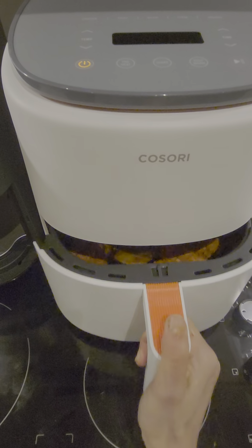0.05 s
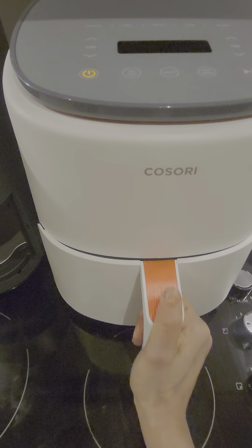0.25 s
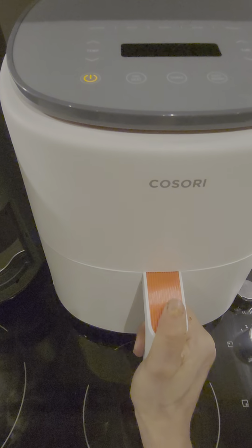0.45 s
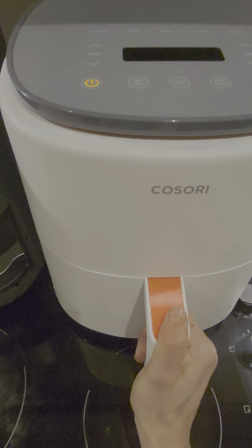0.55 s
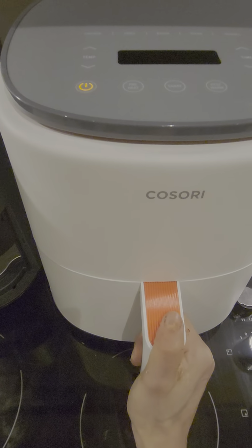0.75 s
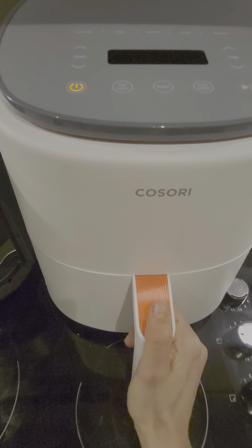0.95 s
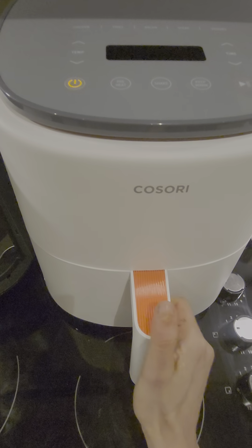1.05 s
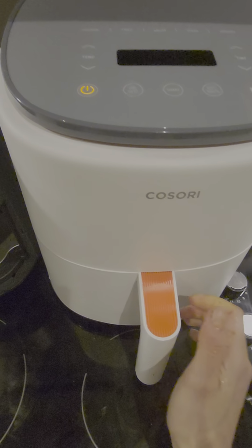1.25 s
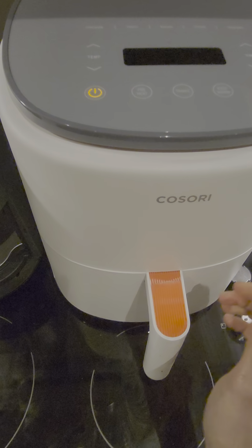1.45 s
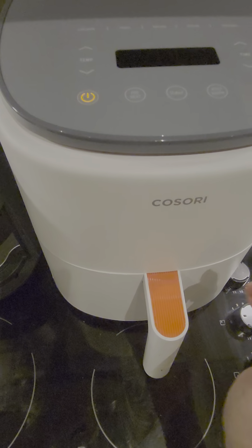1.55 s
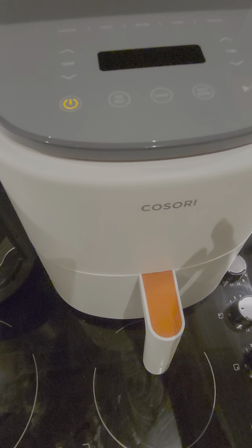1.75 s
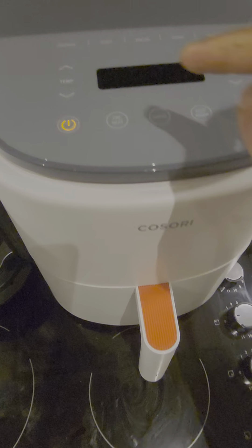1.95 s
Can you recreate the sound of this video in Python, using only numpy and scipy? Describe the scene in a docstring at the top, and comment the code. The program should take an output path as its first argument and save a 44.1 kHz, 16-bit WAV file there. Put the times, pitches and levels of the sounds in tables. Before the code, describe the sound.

Close by in a quiet kitchen, an air fryer drawer slides in with a scrape and two plastic knocks, then clunks shut. A soft ring fades as fingers barely brush the handle over a faint hum.

```python
"""An air fryer basket knocks against its housing and shuts with a clunk, close by in a quiet kitchen.
Pushed along its rails, it scrapes by stick-slip friction, knocks twice, then snaps past the catch.
Each impact excites free vibration: the plastic shell clacks and booms, its walls and the metal pan ring,
and heavy blows rock the fryer on its feet. One low note lingers as the hand brushes off the handle.
The room adds diffuse reverberation, a faint rumble and a hum."""
import sys
import numpy as np
from scipy import signal
from scipy.fft import rfft, irfft
from scipy.io import wavfile

SR = 44100
rng = np.random.default_rng(int(sys.argv[2]) if len(sys.argv) > 2 else 0)


def dump_mix(stems):
    """Bounce the given channels to the path in sys.argv[1] as a 16-bit WAV at rate SR."""
    frames = np.atleast_2d(stems).T  # one column per channel
    limited = np.clip(frames, -1, 1)  # hard clip at full scale
    pcm = np.round(limited * 32767).astype(np.int16)
    wavfile.write(sys.argv[1], SR, pcm)


N = 88200

# impacts of basket on housing (time [s], boom level [dB], clack level [dB], tick level [dB])
IMPACTS = [(0.0341, -39.5, -29.5, -75.5), (0.0379, -31, -30.5, -70), (0.195, -37.5, -39.5, -69),
           (.221, -34, -15, -42), (.2275, -22, -18, -44), (.241, -24.5, -19.5, -59.5),
           (0.2534, -15, -39.5, -82.5), (.319, -39.5, -13.5, -35.5), (0.3274, -19, -15.5, -37),
           (0.3369, -10.5, -20, -45.5), (.339, -13.5, -32.5, -62), (.560, -39.5, -23, -32.5),
           (0.566, -44, -26.5, -38), (0.5721, -33.5, -16.5, -22.5), (0.575, -31.5, -20, -32.5),
           (0.5817, -25.5, -18, -38.5), (0.584, -20.5, -8, -29.5), (.589, -22.5, -18, -39.5),
           (0.5964, -28, -37, -53), (0.884, -52.5, -86, -102)]
# modes of the hollow housing (frequency [Hz], gain [dB], T60 [s], left minus right [dB])
HOLLOW_MODES = [(197, -11, .14, 1), (226, -22, .3, 1), (297, -1, .085, -2), (320, -6, .08, -3),
                (402, 0, .065, -8), (436, -9, .05, -7)]
# ringing modes of the housing walls and metal pan, sounded by hard contacts
# (frequency [Hz], gain [dB], T60 [s], left minus right [dB])
WALL_AND_PAN_MODES = [(576, 2, .07, -2), (622, -1, .08, -1), (690, -3, .05, 0), (825, -2, .05, 1),
                      (1130, -4, .07, 1), (1292, -6, .1, 2), (1480, -4, .12, 1), (1800, 3, .07, -2),
                      (2020, -2, .08, -3), (2152, -9, .22, -2), (2305, 1, .09, -3), (2525, 0, .09, -2),
                      (2978, -6, .13, -2)]
# spectra of the plastic's clack and sharp tick (frequency [Hz], relative density [dB])
CLACK_SPECTRUM = [(60, -19.5), (250, 1.5), (470, 3), (600, 12.5), (820, -0.5), (1000, -2), (1300, -0.5),
                  (1800, -2), (2600, -7), (3600, -15.5), (4200, -17), (9000, -43), (16000, -52)]
TICK_SPECTRUM = [(500, -31), (2000, 5), (3400, 6.5), (4300, -9), (6000, -1.5), (8000, -3), (10000, -10.5),
                 (15500, -16.5)]
# damping of the clack and tick (frequency [Hz], T60 [s])
CLACK_DECAY = [(200, .06), (1000, .042), (2500, .04), (8000, .035), (16000, .03)]
TICK_DECAY = [(2000, 0.089), (6000, 0.081), (16000, 0.085)]
# blows that rock the fryer (time [s], bounce level [dB], sway level [dB])
HEAVY_BLOWS = [(0.23, -33, -53.5), (0.331, -26.5, -31.5), (0.364, -31, -37.5), (.601, -18.5, -38.5),
               (0.63, -35, -25.5), (0.727, -37.5, -38.5)]
# course of the rail friction (time [s], body level [dB], hiss level [dB])
FRICTION_LEVELS = [(0, -43, -60), (.05, -39.5, -59.5), (0.119, -39, -54.5), (.17, -43, -59.5),
                   (0.211, -38, -60), (0.302, -37, -62.5), (0.339, -44, -75), (0.421, -69.5, -97),
                   (.52, -63, -94.5), (.548, -40.5, -67.5), (0.574, -38, -54.5), (0.601, -81.5, -97.5)]
# spectra of the scrape's hollow body and fine hiss (frequency [Hz], relative density [dB])
BODY_SPECTRUM = [(40, -15), (100, 0.5), (200, -10.5), (330, 6), (520, -2.5), (1100, -3), (1500, -7.5),
                 (2400, -7.5), (3400, -15), (4400, -27.5), (8000, -50.5), (15500, -60)]
HISS_SPECTRUM = [(1500, -28), (4000, -5.5), (6400, -0.5), (8200, -3), (10500, -9), (15500, -10.5)]
# fingers on the handle (time [s], rise [s], fade [s], level [dB], centre [Hz], width [octaves])
FINGER_RUBS = [(1.047, 0.009, 0.094, -75.5, 2894, 0.37), (1.072, 0.027, .06, -82.5, 7940, 0.42),
               (1.16, 0.025, 0.087, -74.5, 1940, 1.3), (1.43, .012, 0.075, -77, 2250, 0.39),
               (1.445, 0.018, .05, -82, 7500, 0.67), (1.632, 0.031, 0.083, -70.5, 8900, 0.66),
               (1.66, 0.012, 0.15, -74, 1572, 0.95), (1.783, 0.012, 0.086, -68.5, 1163, 0.52),
               (1.784, 0.0099, .04, -74, 5914, 1.4)]
# reverberation time of the kitchen (frequency [Hz], T60 [s])
ROOM_DECAY = [(60, .42), (160, .7), (280, .5), (500, .52), (1200, .47), (2400, .53), (3500, .48),
              (5000, .48), (9000, .41), (15000, .26)]
# strength of the reverberation (frequency [Hz], gain [dB])
ROOM_RESPONSE = [(50, -14), (100, -9.5), (170, -8.5), (400, -15.5), (1100, -12), (2300, -17.5),
                 (4000, -15.5), (8000, -15.5), (15000, -13.5)]
# spectrum of the room tone (frequency [Hz], relative density [dB])
RUMBLE_SPECTRUM = [(15, -45), (25, -1.5), (102, 2.5), (149, -15.5), (185, -6), (212, -12.5), (344, -12.5),
                   (607, -25.5), (1400, -35.5), (5000, -50), (8140, -43.5), (16000, -51.5)]
# likeness of the two channels (frequency [Hz], correlation [0 to 1])
STEREO_COHERENCE = [(60, .98), (180, 0.92), (350, 0.61), (700, 0.06), (16000, .05)]
# balance of the two channels (frequency [Hz], left minus right [dB])
STEREO_BALANCE = [(100, -1), (270, 1), (450, -0.5), (750, -2.5), (1200, 4.5), (2000, -3.5), (3300, 0),
                  (5500, 0.5), (15000, -0.5)]

# rocking on the feet (frequency [Hz], gain [dB], T60 [s], left minus right [dB])
BOUNCE_MODE, SWAY_MODE = (91, 0, .24, .5), (53, 0, .36, 0)
BOOM_RISE_S, CONTACT_RISE_S, ROCK_RISE_S, RIGHT_DELAY_S = .0016, .00082, .0026, .00046
RING_RE_CLACK_DB, SHELL_SHARE = -19, .3  # share of the noise power common to all impacts
SLIPS_PER_S, SLIP_SPREAD_DB = 4200, -5.5
LINGER_AT_S, LINGER_HZ, LINGER_DB, LINGER_T60_S = .586, 355, -49.5, 1.3
RUMBLE_DB, HUM_HZ, HUM_DB = -65, 98, -75
CUTOFF_HZ = 15900


def basket_impacts():
    """Impact excitation: the housing booms, its walls and the pan ring, the plastic clacks and ticks."""
    out = np.zeros((2, N))
    boom = damped_modes(HOLLOW_MODES, BOOM_RISE_S, RIGHT_DELAY_S)
    ring = amp(RING_RE_CLACK_DB) * damped_modes(WALL_AND_PAN_MODES, CONTACT_RISE_S, RIGHT_DELAY_S)
    shell = noise(.1)
    rise = 1 - np.exp(-np.arange(shell.shape[1]) / SR / CONTACT_RISE_S)
    for start, boom_db, clack_db, tick_db in IMPACTS:
        excitation = np.sqrt(SHELL_SHARE) * shell + np.sqrt(1 - SHELL_SHARE) * noise(.1)
        clack = damp_bands(unit_rms(stereo_filter(excitation, CLACK_SPECTRUM)), CLACK_DECAY)
        tick = damp_bands(unit_rms(stereo_filter(excitation, TICK_SPECTRUM)), TICK_DECAY)
        add(out, start, rise * (amp(clack_db) * clack + amp(tick_db) * tick))
        add(out, start, amp(boom_db) * boom + amp(clack_db) * ring)
    return out


def fryer_rocking():
    """Mass on a spring: heavy blows make the fryer bounce and sway on its rubber feet."""
    out = np.zeros((2, N))
    bounce = damped_modes([BOUNCE_MODE], ROCK_RISE_S)
    sway = damped_modes([SWAY_MODE], ROCK_RISE_S)
    for start, bounce_db, sway_db in HEAVY_BLOWS:
        add(out, start, amp(bounce_db) * bounce + amp(sway_db) * sway)
    return out


def rail_scrape():
    """Stick-slip friction: tiny random slips over a smooth rub drive a hollow body and a fine hiss."""
    t = np.arange(N) / SR
    slips = rng.random(N) < SLIPS_PER_S / SR
    strengths = amp(SLIP_SPREAD_DB * np.minimum(rng.exponential(1, N), 4))
    friction = unit_rms(slips * strengths * noise(N / SR)) + noise(N / SR)
    times, body_db, hiss_db = np.transpose(FRICTION_LEVELS)
    body = unit_rms(stereo_filter(friction, BODY_SPECTRUM)) * amp(np.interp(t, times, body_db))
    hiss = unit_rms(stereo_filter(friction, HISS_SPECTRUM)) * amp(np.interp(t, times, hiss_db))
    return body + hiss


def lingering_mode():
    """Free decay: one lightly damped mode of the metal rings on after the closing clunk."""
    t = np.maximum(np.arange(N) / SR - LINGER_AT_S, 0)
    return amp(LINGER_DB - 60 * t / LINGER_T60_S) * np.sin(2 * np.pi * LINGER_HZ * t)


def finger_rubs():
    """Sliding friction: skin leaving the handle gives soft bursts of band-limited noise."""
    out, t = np.zeros((2, N)), np.arange(SR // 2) / SR
    hz = np.fft.rfftfreq(len(t), 1 / SR) + 1
    for start, rise_s, fade_s, db, centre, octaves in FINGER_RUBS:
        band = np.exp(-.5 * (np.log2(hz / centre) / octaves) ** 2)
        rub = unit_rms(irfft(rfft(noise(.5)) * band))
        envelope = np.minimum(t / rise_s, 1) * np.exp(-(t / fade_s) ** 2)
        add(out, start, amp(db) * rub * envelope)
    return out


def kitchen_reverberation(direct, build_s=.01, length_s=.9):
    """Diffuse field: the dense reflections of a small hard room act as a decaying noise response."""
    t = np.arange(SR) / SR
    tail = damp_bands(noise(1), ROOM_DECAY) * (1 - np.exp(-t / build_s))
    response = stereo_filter(tail / np.linalg.norm(tail[0]), ROOM_RESPONSE) * (t < length_s)
    return signal.fftconvolve(direct, response, axes=1)[:, :N]


def room_tone():
    """Noise floor: a faint rumble and the pure tone of a humming appliance."""
    rumble = unit_rms(stereo_filter(noise(N / SR), RUMBLE_SPECTRUM))
    hum = np.sqrt(2) * np.sin(2 * np.pi * HUM_HZ * np.arange(N) / SR)
    return amp(RUMBLE_DB) * rumble + amp(HUM_DB) * hum


def damped_modes(modes, rise_s, right_delay_s=0):
    """Modal superposition: decaying sinusoids, with a level and time offset between the channels."""
    t = np.maximum(np.arange(SR) / SR - np.array([[0], [right_delay_s]]), 0)
    side = np.array([[.5], [-.5]])
    ringing = sum(amp(db - 60 * t / t60 + side * balance_db) * np.sin(2 * np.pi * hz * t)
                  for hz, db, t60, balance_db in modes)
    return ringing * (1 - np.exp(-t / rise_s))


def damp_bands(x, decay):
    """Frequency-dependent damping: each band falls 60 dB in its own T60."""
    n = x.shape[1]
    hz, t, spectrum = np.fft.rfftfreq(n, 1 / SR), np.arange(n) / SR, rfft(x)
    centres, t60s = np.transpose(decay)
    bands = [log_interp(list(zip(centres, weights)), hz) for weights in np.eye(len(decay))]
    return sum(irfft(spectrum * band, n) * amp(-60 * t / t60) for band, t60 in zip(bands, t60s))


def stereo_filter(white, gains):
    """Partial coherence: two independent noises are blended, balanced and spectrally shaped."""
    n = white.shape[1]
    hz = np.fft.rfftfreq(n, 1 / SR)
    left, independent = rfft(white)
    coherence = log_interp(STEREO_COHERENCE, hz)
    right = coherence * left + np.sqrt(1 - coherence ** 2) * independent
    balance = amp(log_interp(STEREO_BALANCE, hz) / 2)
    return irfft(np.array([left * balance, right / balance]) * amp(log_interp(gains, hz)), n)


def log_interp(points, hz):
    frequencies, values = np.transpose(points)
    return np.interp(np.log(hz + 1), np.log(frequencies + 1), values)


def amp(db):
    return 10 ** (np.asarray(db) / 20)


def unit_rms(x):
    return x / np.sqrt(np.mean(x ** 2) + 1e-20)


def noise(seconds):
    return rng.standard_normal((2, round(seconds * SR)))


def add(mix, start_s, sound):
    part = mix[:, max(round(start_s * SR), 0):]
    part[:, :sound.shape[1]] += sound[:, :part.shape[1]]


def scene():
    """Superposition: direct sound, reverberation and background add linearly."""
    direct = basket_impacts() + fryer_rocking() + rail_scrape() + finger_rubs()
    return direct + lingering_mode() + kitchen_reverberation(direct) + room_tone()


def record(dry):
    """Band limiting: a linear-phase low-pass filter removes the highest treble."""
    taps = signal.firwin(511, CUTOFF_HZ, window=("kaiser", 9), fs=SR)
    return signal.oaconvolve(dry, taps[None], "same")


dry = scene()
out = record(dry)
dump_mix(out)
```